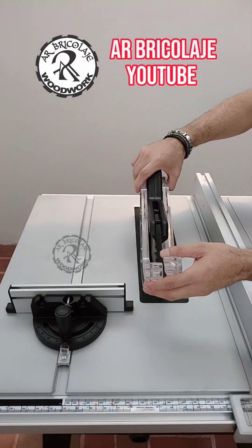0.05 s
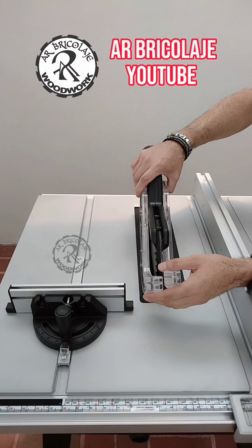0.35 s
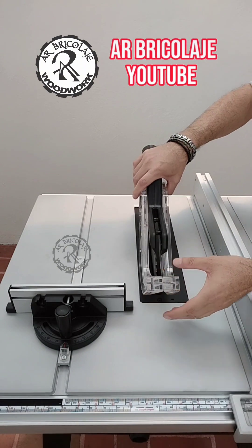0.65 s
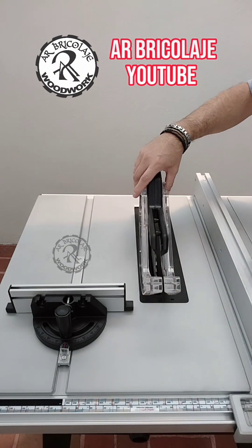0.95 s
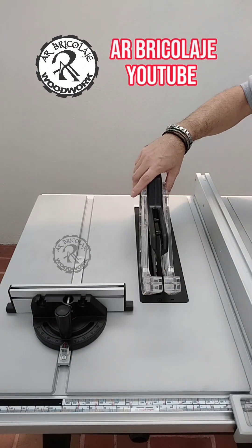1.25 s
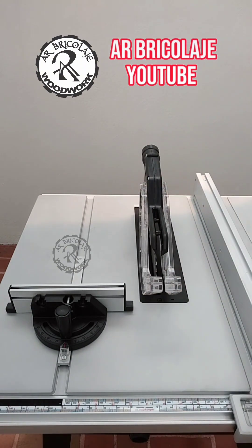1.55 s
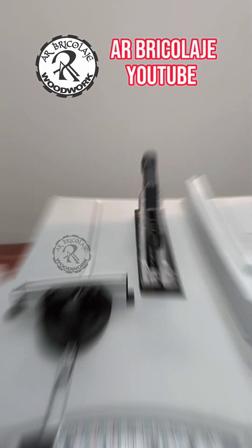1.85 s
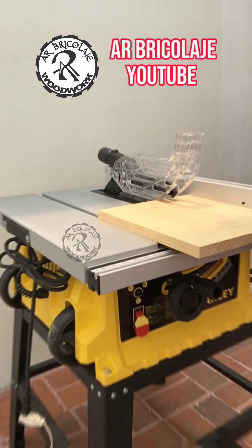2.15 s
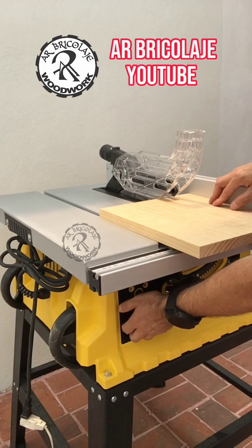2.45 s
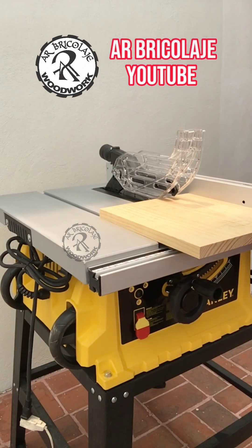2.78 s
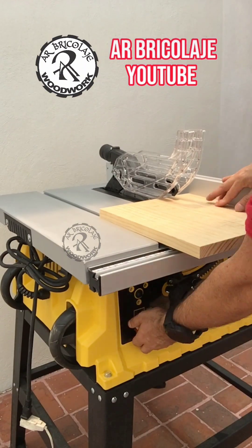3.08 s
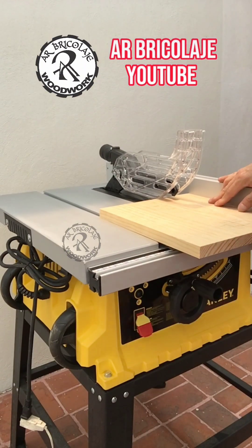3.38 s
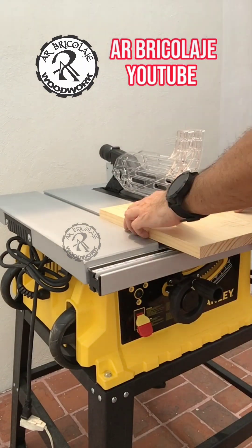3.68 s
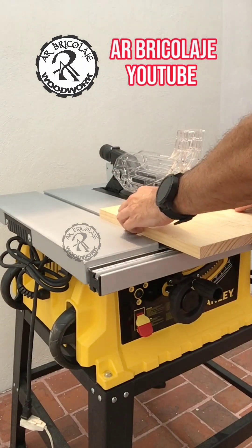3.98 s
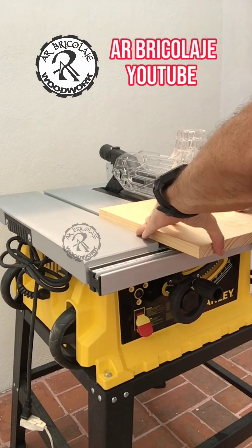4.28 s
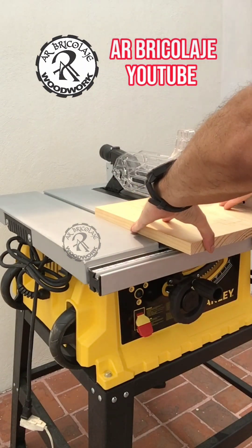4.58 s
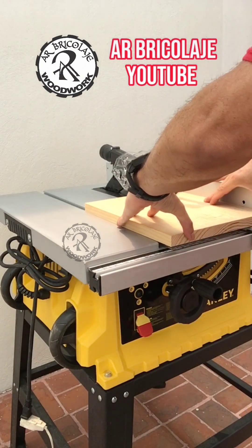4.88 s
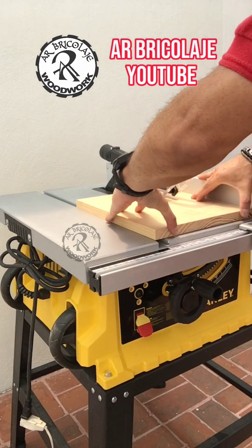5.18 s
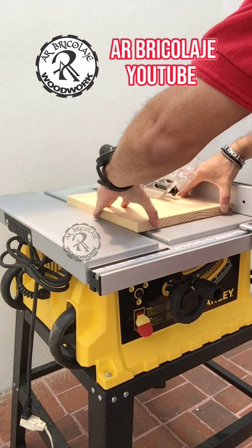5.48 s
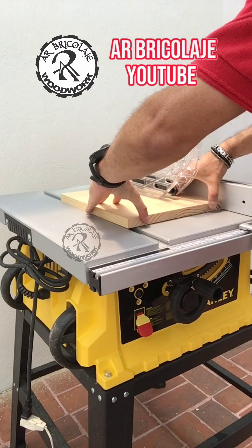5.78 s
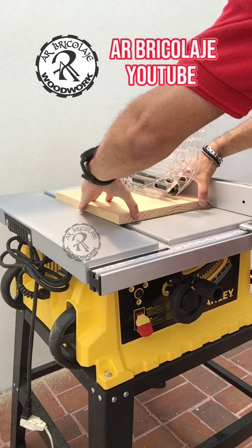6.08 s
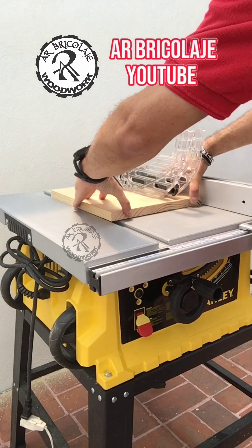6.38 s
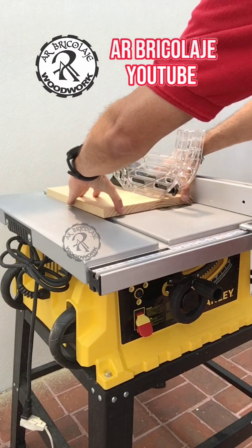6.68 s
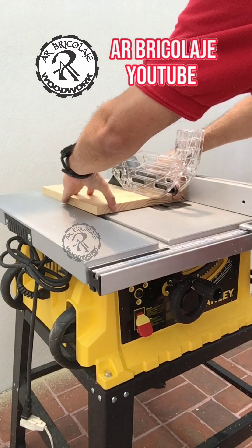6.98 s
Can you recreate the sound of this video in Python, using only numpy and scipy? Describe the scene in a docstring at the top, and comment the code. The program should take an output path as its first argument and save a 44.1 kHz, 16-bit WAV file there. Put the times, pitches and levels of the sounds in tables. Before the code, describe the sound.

A plastic guard clicks into place, then a table saw starts with a jolt, whines up and rasps through a wooden board.

```python
"""Table saw: guard, start, cut.

A plastic blade guard clicks into place in a small workshop; the room noise drops to a hush.
The motor starts with a jolt and the 24-tooth blade spins up to a whine and a bright hiss of air.
A board is fed in: the speed sags, the whine gives way to rasping teeth and the ringing steel plate,
which squeals and sings as it rubs in the kerf."""
import sys
import numpy as np
from scipy import signal
from scipy.fft import rfft, irfft, next_fast_len
from scipy.io import wavfile
from scipy.ndimage import uniform_filter1d

SR = 44100
rng = np.random.default_rng(int(sys.argv[2]) if len(sys.argv) > 2 else 0)


def wav_record(signal):
    """Record a signal, one row per channel, as 16-bit PCM in the file named by sys.argv[1]."""
    frames = np.transpose(np.atleast_2d(signal))
    bounded = np.clip(frames, -1, 1)
    # unit amplitude maps onto the largest positive 16-bit level
    quanta = np.round(bounded * 32767).astype(np.int16)
    wavfile.write(sys.argv[1], SR, quanta)


N = 319725
TIME = np.arange(N) / SR
HUSH_S, START_S, ENTRY_S = 2.668, 3.2125, 4.755  # room drops, motor on, board meets blade
TEETH, GEAR_RATIO, TOP_TOOTH_HZ = 24, 5.25, 1804.4
BAND_EDGE_HZ = 15760

# room noise (frequency [Hz], density [dB])
ROOM_SPECTRUM = [(15, -41), (25, -10.5), (96, -4), (140, 1), (183, -5), (340, -10.5), (482, -16),
                 (919, -15.5), (1080, -21), (1200, -19.5), (2770, -37.5), (3930, -44), (9550, -62),
                 (13200, -53.5), (15500, -60)]
# stereo width of the room noise (frequency [Hz], side weighting [dB])
ROOM_WIDTH = [(30, -13.5), (90, -14), (300, -7), (700, -4), (3000, -0.5), (12000, 4)]
# thin hush (frequency [Hz], density [dB])
HUSH_SPECTRUM = [(24, -77), (40, -50), (325, -30.5), (522, -13), (797, -7), (881, -1.5), (949, -1),
                 (2450, -15.5), (2710, -13), (3060, -17.5), (6640, -21.5), (15500, -40.5)]
# soft movements (time [s], length [s], level [dB])
RUSTLES = [(1.226, 0.22, -70), (1.573, .19, -70), (1.68, 0.89, -72), (2.4, 0.13, -71), (2.516, 0.15, -70)]
# their rustle (frequency [Hz], density [dB])
RUSTLE_SPECTRUM = [(800, -1), (3500, 4.5), (7000, -1.5), (10000, -7.5), (15000, -9)]
# wall echoes (frequency [Hz], t60 [s])
WALL_DECAY = [(200, 0.12), (1500, 0.19), (5000, 0.34), (14000, 0.17)]
# bumps against the stand (time [s], level [dB])
BUMPS = [(1.516, -37), (1.636, -53), (1.775, -41), (1.814, -38.5), (1.861, -37), (2.38, -45)]
# stand modes (frequency [Hz], level [dB], t60 [s])
STAND_MODES = [(105, -2.5, 0.11), (132, -1, 0.16), (218, -5, 0.1)]
# guard knocks (time [s], level [dB], tilt [dB/octave], body ring [dB])
KNOCKS = [(0.185, -35, 4.5, 7), (0.1929, -24.5, 2.5, -0.5), (.203, -21, 1, -7), (.212, -26, 4, -4.5),
          (0.2796, -23.5, 4, -3.5), (0.289, -32.5, -5, 5.5), (0.388, -21.5, -0.5, 0), (0.613, -56.5, 6, 10),
          (0.689, -49.5, 11, -12), (0.749, -26.5, 2.5, -15), (1.288, -41.5, -1.5, -0.5),
          (1.315, -47.5, 5.5, 0), (1.379, -59, 13, -9), (1.44, -55.5, 8, -6), (1.515, -52, 4, -7)]
# guard on the table (frequency [Hz], level [dB], t60 [s])
GUARD_MODES = [(127, -13, 0.16), (255, -1.5, 0.0793), (301, 2, 0.081), (395, -10, .06), (502, -3, 0.13),
               (568, 2.5, 0.078), (723.5, -8, .06), (876.7, -8, 0.065), (1215, -7.5, 0.12), (1506, -6, .11),
               (2460, -19.5, 0.14), (3960, -25.5, 0.16)]
# plastic clack (frequency [Hz], density [dB])
CLACK_SPECTRUM = [(40, -22.5), (120, -6.5), (300, -4.5), (600, 2), (1000, -2), (1600, -5.5), (2100, -10),
                  (4200, -16), (5500, -23.5), (9000, -42.5), (15500, -48.5)]
# gear clash (frequency [Hz], density [dB])
CLASH_SPECTRUM = [(120, -95), (200, -65), (407, -57), (596, -38.5), (1070, -9), (1210, -7), (1430, -12),
                  (1810, -5), (2250, -12), (2960, -8.5), (15500, -11)]
# housing modes (frequency [Hz], level [dB], t60 [s])
HOUSING_MODES = [(607, -21.5, 0.78), (930, -6, 0.1), (1223, -5.5, 0.37), (1790, -2.5, 0.44),
                 (2430, -7, 0.34), (3130, -1.5, 0.32), (4070, -3.5, 0.26), (5230, -17, .16)]
# board load, following the push of the hands (time [s], tooth rate lost [Hz])
LOAD_SAG = [(4.785, 0), (5.2, 212), (5.37, 279), (5.52, 308), (6.0, 323), (6.5, 311), (6.75, 332),
            (7.25, 310)]
# cabinet drone pitches (frequency [Hz])
CABINET_HZ = (382, 675, 1310)
# cabinet resonance at each pitch (width [Hz], level [dB])
CABINET_BANDS = [(10, -96), (30, -77.5), (50, -61.5)]
# air driven through the housing (frequency [Hz], density [dB])
AIR_SPECTRUM = [(60, -52), (250, -43), (450, -43), (680, -23), (900, -13.5), (1150, -9), (1320, -2),
                (1480, -0.5), (1900, 8.5), (2450, -2), (3100, 3), (4800, -2.5), (6100, 3), (16000, 2.5)]
# vortices shed by the teeth (frequency [x tooth rate], density [dB])
VORTEX_SPECTRUM = [(1, -51), (5.6, -30.5), (5.95, -22), (6.2, -8), (6.75, 2.5), (7.02, 4.5), (7.45, 7.5),
                   (7.85, -2), (8.3, -1), (9.0, -12), (11, -13.5), (14, 7.5), (17, 0), (24, -11)]
# siren overtones (order [x tooth rate], level [dB])
SIREN_ORDERS = [(2, -5), (3, 0), (4, -9.5), (5, -2.5), (6, -11.5)]
# labouring motor (order [x armature speed], level [dB])
MOTOR_ORDERS = [(1, -95.5), (3, -66.5), (4, -60), (5, -58.5), (6, -79), (12, -57), (25, -67)]
# plate rubbing in the kerf (time [s], length [s], frequency [Hz], level [dB])
SQUEALS = [(4.8, .4, 8130, -51), (4.88, .25, 6035, -47), (4.93, .95, 11545, -41.5),
           (5.14, .55, 15055, -38.5), (5.15, .45, 5965, -49.5), (5.3, .17, 4350, -44),
           (5.39, .5, 6540, -47), (7.05, .5, 4247, -49), (7.1, .4, 8165, -46.5)]
# steel blade modes (frequency [Hz], width [Hz], tooth-driven level [dB], air-driven level [dB])
BLADE_MODES = [(4287, 30, -54, -59.5), (4340, 53, -57, -67), (4570, 55, -62.5, -76), (7300, 36, -67.5, -83),
               (8400, 70, -79, -65), (9720, 50, -58, -76.5), (10400, 40, -60.5, -74), (10800, 35, -63, -71),
               (11080, 45, -50, -51), (11580, 47, -52, -49), (12870, 23, -69, -51.5),
               (12440, 30, -55, -56.5), (12400, 35, -63, -60), (13300, 30, -54, -62.5),
               (13100, 50, -75, -56), (13600, 25, -60, -52), (13800, 25, -67, -66), (13900, 25, -58, -67.5),
               (14565, 20, -56, -64), (14732, 30, -71, -54), (15057, 35, -56, -66)]
# rumble of the cut (frequency [Hz], density [dB])
RUMBLE_SPECTRUM = [(30, 1), (150, 2.5), (400, 1), (700, -6), (1500, -25), (6000, -58)]
# teeth tearing wood (frequency [Hz], density [dB])
RASP_SPECTRUM = [(30, -32), (300, -27), (520, -22), (800, -5.5), (1200, -2.5), (1550, -2), (1800, 8.5),
                 (2500, 0.5), (3600, -3.5), (4400, -0.5), (5300, -15.5), (8000, 5.5), (12000, 3.5),
                 (16000, 3.5)]


def amp(db):
    """Decibels to gain."""
    return 10 ** (np.asarray(db) / 20)


def unit(x):
    """Scale to rms 1."""
    return x / np.sqrt(np.mean(x ** 2) + 1e-20)


def decay(t, t60_s):
    """Exponential fall, 60 dB in t60_s."""
    return np.exp(-np.log(1000) * t / t60_s)


def at_hz(points, hz):
    """Interpolate a table on a log-frequency axis."""
    knots_hz, values = np.transpose(points)
    return np.interp(np.log(hz + 0.0012), np.log(knots_hz), values)


def add(mix, start_s, sound):
    """Mix a sound in at start_s."""
    part = mix[max(round(start_s * SR), 0):][:len(sound)]
    part += sound[:len(part)]


def colour(x, spectrum, tilt_db_per_octave=0):
    """Shape x by a spectrum, tilted near 1 kHz; rms 1."""
    size = next_fast_len(x.shape[-1])
    hz = np.fft.rfftfreq(size, 1 / SR)
    gain = amp(at_hz(spectrum, hz) + tilt_db_per_octave * np.log2((hz + 100) / 1000))
    return unit(irfft(rfft(x, size) * gain, size)[..., :x.shape[-1]])


def wander(rate_hz):
    """Smooth random drift, rms 1."""
    knots = rng.standard_normal(4096)
    return unit(np.interp(TIME * rate_hz, np.arange(len(knots)), knots))


def resonate(x, hz, width_hz):
    """Two-pole resonance, rms 1."""
    r = np.exp(-np.pi * width_hz / SR)
    return unit(signal.lfilter([1, 0, -1], [1, -2 * r * np.cos(2 * np.pi * hz / SR), r * r], x))


def steep_band(x, hz, width_hz, skirt_ratio=3):
    """Resonance with its skirts trimmed by a wider one."""
    return resonate(resonate(x, hz, width_hz), hz, skirt_ratio * width_hz)


def ring(modes, t):
    """Decaying modes after one blow."""
    return sum(amp(db) * decay(t, t60_s) * np.sin(2 * np.pi * (hz * t + rng.random()))
               for hz, db, t60_s in modes)


def swell(length_s):
    """Half-sine rise and fall."""
    return np.sin(np.linspace(0, np.pi, int(length_s * SR)))


def background(room_db=-49.5, side_db=-7, hush_db=-69.5):
    """Low room noise and soft rustles, dropping suddenly to a hush."""
    mid, side, rustle, hush = rng.standard_normal((4, N))
    mid = colour(mid, ROOM_SPECTRUM)
    side = amp(side_db) * colour(colour(side, ROOM_WIDTH), ROOM_SPECTRUM)
    room = np.array([mid + side, mid - side]) * amp(room_db + 0.76 * wander(13))
    movement = np.zeros(N)
    for start_s, length_s, db in RUSTLES:
        add(movement, start_s, amp(db) * swell(length_s))
    room += colour(rustle, RUSTLE_SPECTRUM) * movement
    return np.where(TIME < HUSH_S, room, colour(hush, HUSH_SPECTRUM) * amp(hush_db))


def thin_tone(start_s=2.98, hz=2680, db=-78):
    """Faint whistle in the hush, until the motor starts."""
    return ((TIME > start_s) & (TIME < START_S)) * amp(db) * np.sin(2 * np.pi * hz * TIME)


def wall_echoes(x):
    """Sparse reflections, separate for each ear; decay depends on frequency."""
    taps = rng.standard_normal((2, SR // 2)) * (rng.random((2, SR // 2)) < 0.08)
    hz, t, bins = signal.stft(taps, SR, nperseg=256)
    tail = signal.istft(bins * decay(t, at_hz(WALL_DECAY, hz)[:, None]), SR)[1]
    return signal.fftconvolve(x[None], tail / np.linalg.norm(tail[0]), axes=1)[:, :N]


def table_echoes(x, t60_s=0.049, share=0.45):
    """Table top and cabinet scatter the sound, combing it with narrow peaks."""
    t = np.arange(SR // 10) / SR
    taps = rng.standard_normal(len(t)) * decay(t, t60_s)
    return (x + share * signal.oaconvolve(x, taps / np.linalg.norm(taps))[:N]) / np.hypot(1, share)


def bumps(rise_s=0.0049):
    """Soft bumps ring the stand: dull thuds."""
    out, t = np.zeros(N), np.arange(SR // 3) / SR
    for start_s, db in BUMPS:
        add(out, start_s, amp(db) * (1 - np.exp(-t / rise_s)) * ring(STAND_MODES, t))
    return out


def guard(firm_db=-23, firm_rise_s=0.0019, rattle_db=-12.5, side_db=-7, wet_db=-14, ear_lag_s=9e-5):
    """Plastic knocks: a crack, a rattle of loose parts and the guard's modes."""
    left, right, t = np.zeros(N), np.zeros(N), np.arange(SR // 3) / SR
    for start_s, db, tilt, body_db in KNOCKS:
        softness = amp(firm_db - db)  # softer knocks rise slower and clatter longer
        rise_s, stretch = firm_rise_s * softness ** 0.25, softness ** 0.098
        clatter = decay(t, 0.041 * stretch) + amp(rattle_db) * decay(t, 0.25 * stretch)
        clack, side = colour(rng.standard_normal((2, len(t))), CLACK_SPECTRUM, tilt) * clatter
        blow = amp(db) * (1 - np.exp(-t / rise_s))
        mid = clack + amp(body_db) * ring(GUARD_MODES, t)
        add(left, start_s, blow * (mid + amp(side_db) * side))
        add(right, start_s + ear_lag_s, blow * (mid - amp(side_db) * side))
    return np.array([left, right]) + amp(wet_db) * wall_echoes((left + right) / 2)


def jolt(clash_db=-33, ring_db=-40, clash_t60_s=0.43, rise_s=0.0016):
    """The gears slam into mesh and ring the housing."""
    out, t = np.zeros(N), np.arange(SR) / SR
    clash = amp(clash_db) * colour(rng.standard_normal(SR), CLASH_SPECTRUM) * decay(t, clash_t60_s)
    housing = amp(ring_db) * ring(HOUSING_MODES, t)
    add(out, START_S, (1 - np.exp(-t / rise_s)) * (clash + housing))
    return out


def cut_time_s():
    """Time since the board met the blade."""
    return np.maximum(TIME - ENTRY_S, 0)


def sag_hz(t=TIME):
    """Tooth rate lost to the board's load."""
    return np.interp(t, *np.transpose(LOAD_SAG))


def tooth_hz(t=TIME, surge_hz=1401, surge_s=0.13, creep_hz=199, creep_s=0.55):
    """Tooth rate: a quick surge and a slow creep up; the board drags it down."""
    run_s = np.maximum(t - START_S, 0)
    shortfall_hz = surge_hz * np.exp(-run_s / surge_s) + creep_hz * np.exp(-run_s / creep_s)
    return TOP_TOOTH_HZ - shortfall_hz - sag_hz(t)


def cabinet_drone(gusts, speed):
    """Cabinet resonances hum while the motor runs."""
    return speed * sum(amp(db) * steep_band(gusts, hz, width_hz, skirt_ratio=2)
                       for hz, (width_hz, db) in zip(CABINET_HZ, CABINET_BANDS))


def housing_air(speed, covered, db=-38, covered_db=-2):
    """The blade drives air through the housing."""
    rush = colour(rng.standard_normal(N), AIR_SPECTRUM)
    return rush * amp(db + covered_db * covered + 0.51 * wander(25)) * speed ** 0.77


def rim_hiss(speed, covered, db=-38, covered_db=-3, fade_db_per_s=-1, patchy_db=1.9):
    """Tooth vortices: patchy hiss that slides with speed and fades under the board."""
    hz, t, bins = signal.stft(rng.standard_normal(N), SR, nperseg=512, noverlap=384)
    patches = uniform_filter1d(rng.standard_normal(bins.shape), size=12, axis=0)
    patches = unit(uniform_filter1d(patches, size=8, axis=1))
    shape_db = at_hz(VORTEX_SPECTRUM, hz[:, None] / tooth_hz(t)) + patchy_db * patches
    gain = amp(shape_db) * (hz[:, None] < BAND_EDGE_HZ)
    gain /= np.sqrt(np.mean(gain ** 2, axis=0))
    hiss = signal.istft(bins * gain, SR, nperseg=512, noverlap=384)[1][:N]
    spin_up = speed ** 0.37 * np.minimum(2 * speed, 1) ** 3
    return hiss * spin_up * amp(db + covered_db * covered + fade_db_per_s * cut_time_s())


def siren(tooth_cycles, speed, covered, peak_hz=1745, width_hz=82, peak_db=-35.5, fade_db_per_s=-8):
    """The teeth whine, loudest on crossing a housing resonance; the board smothers it."""
    resonance = 1 / np.hypot(1, 2 * (tooth_hz() - peak_hz) / width_hz)
    spin_up = np.minimum(speed / 0.64, 1) ** 6
    level = amp(peak_db + fade_db_per_s * cut_time_s() + 0.5 * wander(22))
    phase = 2 * np.pi * tooth_cycles
    overtones = sum(amp(db + 2.9 * wander(15)) * np.sin(k * phase) for k, db in SIREN_ORDERS)
    overtones *= amp(-55.5 - 1.5 * covered) * speed ** 1.8
    return resonance * spin_up * level * np.sin(phase) + overtones


def load_tones(tooth_cycles, chop_db=-60):
    """Motor tones and the chop of the teeth grow with load."""
    armature_phase = 2 * np.pi * tooth_cycles * GEAR_RATIO / TEETH
    motor = sum(amp(db + 1.07 * wander(7)) * np.sin(k * armature_phase) for k, db in MOTOR_ORDERS)
    chop = amp(chop_db + 2 * wander(12)) * np.sin(4 * np.pi * tooth_cycles)
    load = sag_hz() / sag_hz().max()
    return load ** 1.9 * (motor + chop)


def squeals(width_hz=35, edge_s=0.068, fade_db=-9.5):
    """Each rub drives one narrow plate mode, which catches and fades."""
    out = np.zeros(N)
    for start_s, length_s, hz, db in SQUEALS:
        t = np.arange(int(length_s * SR)) / SR
        tone = steep_band(rng.standard_normal(len(t)), hz, width_hz)
        edges = np.minimum(np.minimum(t, length_s - t) / edge_s, 1)
        add(out, start_s, amp(db + fade_db * t / length_s) * edges * tone)
    return out


def scrape(start_s=5.27, length_s=0.35, hz=7300, width_hz=1100, db=-43):
    """One broad swish as the back of the blade enters the kerf."""
    out, envelope = np.zeros(N), swell(length_s) ** 2
    rub = steep_band(rng.standard_normal(len(envelope)), hz, width_hz)
    add(out, start_s, amp(db) * envelope * rub)
    return out


def singing(hz=4351, final_db=-50, climb_db=59, build_s=0.41, waver_db=2.8, drift_rad=0.6):
    """Friction sustains one wavering plate mode, building as the kerf deepens."""
    phase = 2 * np.pi * hz * TIME + drift_rad * wander(30)
    level_db = final_db - climb_db * np.exp(-cut_time_s() / build_s)
    return (TIME > ENTRY_S) * amp(level_db + waver_db * wander(17)) * np.sin(phase)


def blade_plate(chips, gusts, bite, blown, whistle_hz=12490, whistle_db=-44.5):
    """Teeth and air ring the steel plate; air also excites one high whistling mode."""
    modes = sum(resonate(chips, hz, width_hz) * bite ** 1.5 * amp(tooth_db - 1)
                + resonate(gusts, hz, width_hz) * blown * amp(air_db)
                for hz, width_hz, tooth_db, air_db in BLADE_MODES)
    highpass = signal.butter(3, 3000, "highpass", fs=SR, output="sos")
    whistle = steep_band(gusts, whistle_hz, width_hz=110) * blown * amp(whistle_db)
    return signal.sosfilt(highpass, modes) + whistle


def cut_rumble(chips, settled_db=-90.5, jump_db=24, settle_s=0.53):
    """Low rumble that jumps as the board meets the blade, then settles."""
    level_db = settled_db + jump_db * np.exp(-cut_time_s() / settle_s)
    return colour(chips, RUMBLE_SPECTRUM) * amp(level_db)


def tearing(tooth_cycles, strike_cycles=0.28, uneven_db=1.0, runout=0.067):
    """Each tooth tears off a chip: uneven noise bursts, swelling once a turn."""
    chip_db = uneven_db * rng.standard_normal(N)[tooth_cycles.astype(int)]
    burst = 0.32 + np.exp(-(tooth_cycles % 1) / strike_cycles)
    sway = 1 + runout * np.sin(2 * np.pi * tooth_cycles / TEETH)
    return unit(rng.standard_normal(N) * amp(chip_db) * burst * sway)


def saw(rasp_db=-43, bite_rise_s=0.0306, bite_db=0.33, bite_db_per_s=1.11, onset_s=0.014):
    """Speed drives the air and the tones; the bite drives the rasp and the plate."""
    tooth_cycles = np.cumsum(tooth_hz() * (1 + 0.0005 * wander(30))) / SR
    speed = tooth_hz() / TOP_TOOTH_HZ
    covered = np.minimum(cut_time_s() / bite_rise_s, 1)  # the board hides the rim from the air
    bite = covered * amp(bite_db + bite_db_per_s * cut_time_s())
    blown = np.minimum(speed / 0.886, 1) ** 12 * (1 - covered)  # hiss reaches the plate modes
    air = housing_air(speed, covered) + rim_hiss(speed, covered)
    chips, gusts = tearing(tooth_cycles), rng.standard_normal(N)
    rasp = colour(chips, RASP_SPECTRUM) * bite * amp(rasp_db)
    scattered = table_echoes(air + rasp)
    plate = blade_plate(chips, gusts, bite, blown)
    lows = cabinet_drone(gusts, speed) + covered * cut_rumble(chips)
    tones = siren(tooth_cycles, speed, covered) + load_tones(tooth_cycles)
    running = np.clip((TIME - START_S) / onset_s, 0, 1)
    return running * (scattered + plate + lows + tones)


def scene():
    """Room and guard in stereo; the saw straight ahead."""
    workshop = background() + thin_tone() + guard() + bumps()
    return workshop + jolt() + saw() + squeals() + scrape() + singing()


def record(dry):
    """Low-pass at the band edge."""
    lowpass = signal.firwin(1023, BAND_EDGE_HZ, window=("kaiser", 8), fs=SR)
    return signal.oaconvolve(dry, lowpass[None], "same")


dry = scene()
out = record(dry)
wav_record(out)
```